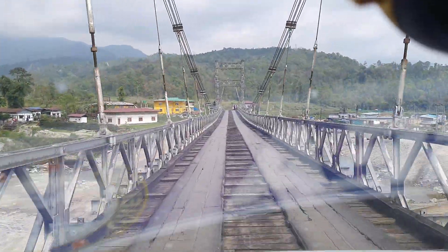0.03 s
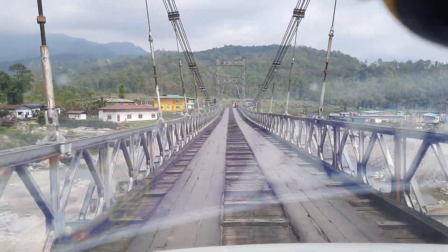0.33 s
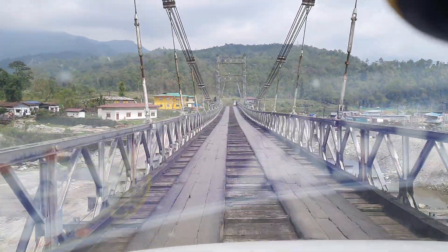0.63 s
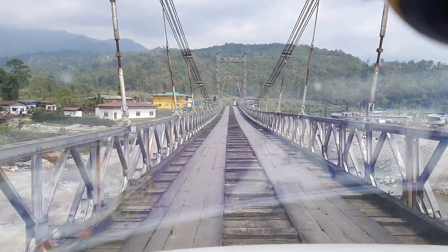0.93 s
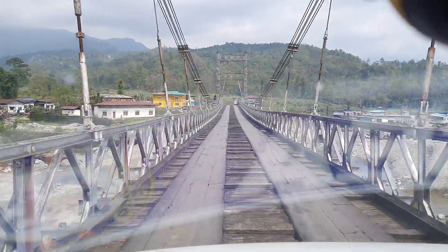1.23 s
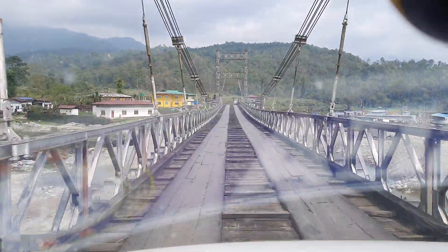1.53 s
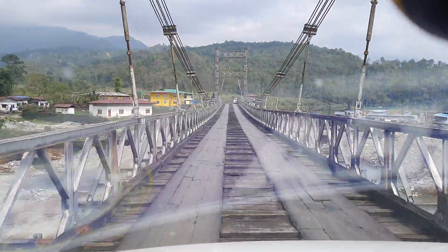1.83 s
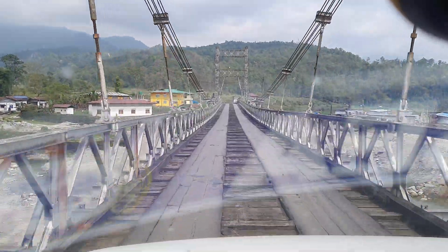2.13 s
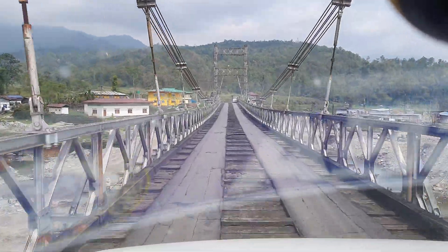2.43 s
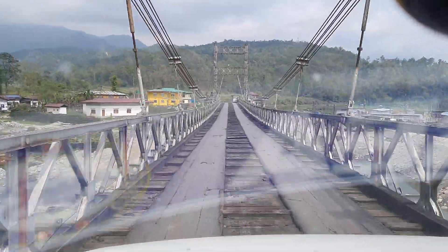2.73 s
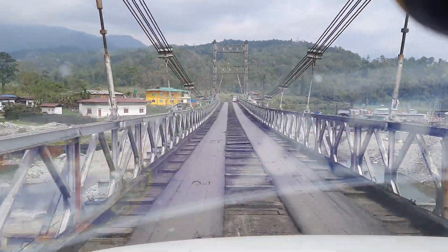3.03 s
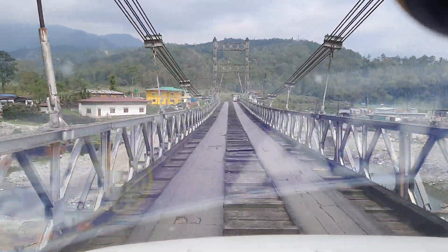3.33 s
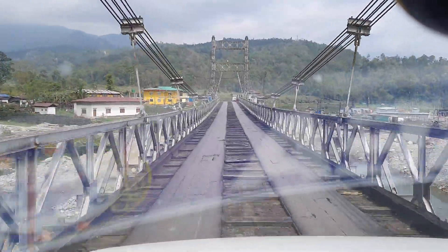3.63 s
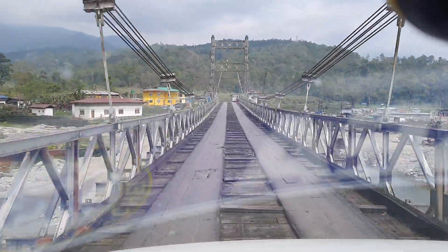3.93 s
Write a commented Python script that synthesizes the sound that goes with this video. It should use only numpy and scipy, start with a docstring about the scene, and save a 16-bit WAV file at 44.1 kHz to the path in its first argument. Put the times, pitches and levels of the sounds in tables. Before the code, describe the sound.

Bridge planks thump and rattle beneath a creeping car, heard from inside with engine rumble.

```python
"""Loose planks under a car

A stereo microphone behind the windscreen, as the car creeps over the deck of a steel suspension bridge.
Just below, planks tip and slap on their bearers, heavy timbers knock and the wheels thump the body.
Close by, plastic cabin trim ticks. Loose metal jingles, one timber groans and grit hisses under the
tyres, all over the low rumble of engine and rolling."""
import sys
import numpy as np
from scipy import signal
from scipy.fft import rfft, irfft, next_fast_len
from scipy.io import wavfile
from scipy.ndimage import uniform_filter1d

SR = 44100
rng = np.random.default_rng(int(sys.argv[2]) if len(sys.argv) > 2 else 0)


def master_out(mix):
    """Clip the mix to full scale and print it as 16-bit PCM to the path in sys.argv[1]."""
    frames = np.transpose(np.atleast_2d(mix))
    ceiling = np.clip(frames, -1, 1)
    pcm = np.round(ceiling * 32767).astype(np.int16)
    wavfile.write(sys.argv[1], SR, pcm)


N = 176400

# Levels in the tables are relative: they are set ahead of the mix and the stereo shaping.
# Planks slapping under the car. Each row: start in seconds, then wood, thud and crack levels in dB.
PLANK_SLAPS = [(0.076, -28, -20, -56), (0.414, -31, -23, -63), (0.522, -36, -19.5, -62),
               (0.752, -28, -21, -49), (0.829, -31, -20.5, -62), (0.875, -27, -19.5, -58),
               (0.929, -20, -21.5, -37.5), (0.997, -21, -16.5, -44), (1.16, -25.5, -19.5, -44.5),
               (1.347, -12.5, -16, -32), (1.422, -15.5, -20.5, -30), (1.556, -21.5, -17, -40.5),
               (1.614, -21, -23.5, -43.5), (1.756, -22.5, -23, -42), (2.147, -22, -17, -40.5),
               (2.321, -30, -18, -50), (2.362, -21.5, -19, -42.5), (2.456, -21.5, -20, -42.5),
               (2.701, -22.5, -17.5, -43.5), (2.764, -31.5, -18, -48.5), (2.84, -16.5, -13, -32),
               (2.872, -23, -15, -46), (2.978, -25.5, -35.5, -49.5), (3.151, -24.5, -19.5, -45),
               (3.22, -16.5, -18, -42), (3.31, -28.5, -40, -41.5), (3.359, -21.5, -28, -35.5),
               (3.454, -24.5, -18.5, -52), (3.671, -23, -24.5, -39), (3.806, -28.5, -29.5, -59),
               (3.858, -28, -22.5, -41.5), (3.895, -21.5, -22, -48), (3.959, -23.5, -21, -42.5)]
# Soft wheel thumps. Each row: start in seconds, level in dB.
WHEEL_THUMPS = [(0.047, -20.5), (0.448, -21.5), (0.885, -19.5), (0.962, -17), (1.785, -17), (1.915, -16),
                (2.176, -25), (2.339, -19.5), (2.371, -16), (2.781, -21.5), (2.932, -18.5), (3.096, -16.5),
                (3.118, -15.5), (3.478, -21.5), (3.504, -20), (3.828, -19)]
# Cabin trim, close to the microphone. Each row: start in seconds, tick level in dB, tap level in dB.
TRIM_TICKS = [(0.1256, -47, -57), (0.3103, -40.5, -57), (1.0006, -29.5, -32.5), (1.3512, -36, -41.5),
              (1.4703, -51, -35.5), (1.491, -40, -41.5), (1.525, -46, -39.5), (1.6876, -53, -38.5),
              (2.0214, -38, -36), (2.15, -47, -37.5), (2.186, -61, -35), (2.238, -57, -34),
              (2.4033, -33.5, -61), (2.515, -41, -54), (2.582, -39.5, -68), (2.6907, -35, -32),
              (2.7236, -47, -36), (2.781, -37.5, -38.5), (3.03, -40.5, -38), (3.0716, -47, -40),
              (3.3963, -70, -32), (3.8564, -42, -36)]
# Heavy timbers and loose metal. Each row: start in seconds, pitch in Hz, level in dB.
BEARER_KNOCKS = [(1.35, 193, -16), (1.836, 125, -11), (1.863, 263, -19), (1.882, 160, -12.5),
                 (2.859, 141, -15), (2.906, 202, -15), (3.23, 160, -21)]
METAL_JINGLES = [(0.205, 8900, -67.5), (0.381, 8700, -63), (0.382, 5080, -57), (0.62, 3470, -59),
                 (0.871, 3770, -58), (0.95, 5140, -57), (1.025, 5270, -54), (1.281, 3730, -50.5),
                 (1.925, 5900, -69)]
# Grit under a tyre. Each row: start in seconds, level in dB, seconds for the crunch to fade by 30 dB.
GRIT_PATCHES = [(0.082, -50, 1), (0.378, -53.5, 0.34), (0.511, -53, 0.074), (0.893, -49, 0.79),
                (1.006, -38, 0.042), (1.168, -49, 0.23), (1.416, -46.5, 0.45), (2.319, -46.5, 0.28),
                (2.399, -45.5, 0.31), (2.851, -47, 0.27), (3.147, -44.5, 0.22), (3.223, -46.5, 0.92),
                (3.456, -45, 0.14), (3.816, -43, 0.17)]
# The rolling background. Each row: time in seconds, rumble level in dB, tyre hiss level in dB.
ROLLING_LEVELS = [(0, -24.5, -41.5), (.3, -31, -68.5), (0.701, -28, -53), (1.3, -22, -48), (1.7, -26, -52),
                  (2.3, -22.5, -46.5), (2.8, -24.5, -47.5), (3.299, -19.5, -44), (3.678, -26.5, -47),
                  (4, -18, -45.5)]
# Resonances of plank, deck and car body. Each row: frequency in Hz, width in Hz, gain in dB.
PLANK_MODES = [(315, 75, -0.5), (464.4, 74, 2), (611, 47.5, 3), (756, 118, -3), (899, 50, -2.5)]
DECK_MODES = [(1428, 230, -3.5), (2064, 220, 1), (2270, 51, 4), (2800, 170, 1.5)]
BODY_MODES = [(75, 21.6, -3.5), (103.4, 33.2, 0), (132, 41, 2.5), (187.2, 87.5, -0.5), (214, 71.6, 0),
              (293, 50.6, -8), (407, 230, -17)]
# Tone colour of each source from inside the car. Each row: frequency in Hz, gain in dB.
CRACK_SPECTRUM = [(300, -19.5), (900, 3.5), (2500, -2), (3200, -6), (4500, -28), (9000, -31.5),
                  (16000, -56)]
TICK_SPECTRUM = [(300, -25), (1200, -21.5), (5200, 4.5), (6150, 2.5), (9500, -10.5), (12500, -3.5),
                 (16000, -10)]
TAP_SPECTRUM = [(200, -46), (800, 7), (5000, -15.5), (12000, -32.5)]
GRIT_SPECTRUM = [(300, -27.5), (1200, 1), (3700, -2), (6500, -15), (8500, -21), (16000, -22.5)]
RUMBLE_SPECTRUM = [(20, -26), (38, -1), (105, -2.5), (160, -11), (240, -12), (350, -25.5), (4000, -73.5)]
HISS_SPECTRUM = [(150, -20.5), (500, 20.5), (800, 2), (1200, 1), (2800, 3), (4200, -4.5), (6300, -11.5),
                 (8500, -24), (16000, -51.5)]
# Stereo width at the microphone. Each row: frequency in Hz, gain of the side channel in dB.
SIDE_GAIN = [(130, -21.5), (250, -6.5), (500, -3.5), (950, 7), (2000, 0.5)]
# Lean of the image to the left. Each row: frequency in Hz, left over right in dB.
LEFT_LEAN = [(120, 2.44), (400, 3.9), (1000, 1.9), (4000, 0.45)]

THUD_DB, WOOD_DB, CRACK_DB, THUMP_DB, TICK_DB, TAP_DB = -1.5, -9.5, -2, -0.5, -9.5, -5.5  # mix offsets
RUMBLE_DB, HISS_DB = 0, -1  # mix offsets
STRIKE_DB, STRIKE_S = 7.5, 0.00024  # the spike that opens a blow
PLANK_DETUNE = 0.061  # spread of log pitch from blow to blow
TILT_DB_PER_OCTAVE, USUAL_SLAP_DB = 0.13, -29  # brightening for each dB above the usual slap
KNOCK_CYCLES = 10  # until a knock has fallen by 60 dB
REBOUND_S, REBOUND_LOSS_DB = 0.0046, 8
JINGLE_RISE_S, JINGLE_T60_S, GRIT_RISE_S = 0.0046, 0.16, 0.02
RATTLES_PER_S, RATTLE_DB, RATTLE_SPREAD_DB = 20, -43.5, 4
FLICKER_DB, FLICKER_FULL_HZ = 2.6, 3200
CRUMBLE_DB, CRUMBLES_PER_S = 2.2, 190  # fast roughness in the tyre noise
TOP_HZ = 15900


def planks():
    """Just below the car, each slap is a thud, a wooden ring and a dry crack; wheels thump in between."""
    s, wood_db, thud_db, crack_db = np.array(PLANK_SLAPS).T
    thump_s, thump_db = np.array(WHEEL_THUMPS).T
    slaps = thud(s, thud_db + THUD_DB) + wood(s, wood_db + WOOD_DB) + crack(s, crack_db + CRACK_DB)
    return slaps + thud(thump_s, thump_db + THUMP_DB)


def thud(times, db):
    """A wheel drops and the body booms around the microphone."""
    blows = contact(len(times), rise_s=0.0012, hold_s=0.0056, t60=0.1, tail_db=-2.5, tail_t60=0.28)
    force = colour(blows, [(20, -20), (60, 2.5), (260, -6), (500, -8.0), (1500, -33.5)])
    return play(times, db, ring(force, BODY_MODES), 0.029)


def wood(times, db):
    """Planks ring, each at a slightly different pitch, brighter when hit harder."""
    blows = contact(len(times), rise_s=.001, hold_s=.004, t60=.05, tail_db=-9, tail_t60=.28)
    force = colour(blows, [(100, -17.5), (300, -2.0), (1000, -1.5), (1400, -6), (4000, -33.5)])
    stretches = np.exp(PLANK_DETUNE * rng.standard_normal(len(times)))
    sounds = []
    for push, loud, stretch in zip(force, db, stretches):
        tilt = TILT_DB_PER_OCTAVE * (loud - USUAL_SLAP_DB)
        modes = [(hz, bw, gain + tilt * np.log2(hz / PLANK_MODES[0][0])) for hz, bw, gain in PLANK_MODES]
        sounds.append(ring(push, modes, stretch))
    return play(times, db, sounds, 0.024)


def crack(times, db):
    """The plank's edge hits its bearer with a dry clack, each at its own pitch."""
    blows = contact(len(times), rise_s=.0007, hold_s=.007, t60=.05, tail_db=-16, tail_t60=.26)
    force = colour(blows, CRACK_SPECTRUM)
    stretches = np.exp(PLANK_DETUNE * rng.standard_normal(len(times)))
    clacks = [push + undb(7.5) * ring(push, DECK_MODES, k) for push, k in zip(force, stretches)]
    return play(times, db, clacks, 0.018)


def bearers():
    """A heavy timber bottoms on the frame: a few deep cycles and a weaker overtone."""
    s, hz, db = np.array(BEARER_KNOCKS).T
    t = np.arange(N // 16) / SR
    swing = lambda cycles: (np.sin(2 * np.pi * cycles) * np.minimum(2 * cycles, 1)
                            * undb(-60 * cycles / KNOCK_CYCLES))
    knocks = np.array([swing(f * t) + undb(-6.5) * swing(1.717 * f * t) for f in hz])
    return play(s, db, knocks[:, None], 0.014) * np.array([[1], [-.5]])  # mid and side gains


def trim():
    """Loose plastic near the microphone: a bright tick over a duller tap, then two uneven rebounds."""
    s, tick_db, tap_db = np.array(TRIM_TICKS).T
    out = tap(s, tap_db + TAP_DB)
    for bounce in range(3):
        blows = contact(len(s), rise_s=.0003, hold_s=.0012, t60=.014, tail_db=-17, tail_t60=.08)
        snaps = colour(blows, TICK_SPECTRUM)
        pitches_hz = rng.uniform(4000, 14000, (len(s), 2))
        ticks = [x + ring(x, [(hz, 250, 8) for hz in pair]) for x, pair in zip(snaps, pitches_hz)]
        out += play(s, tick_db + TICK_DB - bounce * REBOUND_LOSS_DB, ticks, 0.004)
        s = s + REBOUND_S * (.5 + rng.random(len(s)))
    return out


def tap(times, db):
    """Small, dull contacts of trim or boards."""
    blows = contact(len(times), rise_s=0.0003, hold_s=0.00056, t60=0.047, tail_db=-14, tail_t60=0.16)
    return play(times, db, colour(blows, TAP_SPECTRUM), 0.011)


def jingles():
    """Loose metal shakes: a scatter of tiny contacts makes a broad rattle with two thin rings in it."""
    s, hz, db = np.array(METAL_JINGLES).T
    t = np.arange(N // 16) / SR
    envelope = np.minimum(t / JINGLE_RISE_S, 1) * undb(-60 * t / JINGLE_T60_S)
    shakes = rng.standard_normal((len(s), 2, len(t))) ** 3 * envelope
    sounds = []
    for shake, f in zip(shakes, hz):
        broad = (f, f / 2, 0)
        sounds.append(ring(ring(shake, [broad]), [broad, (f * .93, 40, 11), (f * 1.02, 30, 16)]))
    return play(s, db, sounds, 0.031)


def groan(start_s=1.83, length_s=.10, hz=503, db=-39):
    """A timber rubs under the wheel: a brief, unsteady tone."""
    count = int(length_s * SR)
    pitch = hz * (1 + 0.017 * wander(70)[:count])
    tone = np.sin(2 * np.pi * (np.cumsum(pitch) / SR + rng.random((2, 1))))
    return play([start_s], [db], [tone * np.hanning(count)], length_s)


def rattles(effort):
    """Nearby boards chatter weakly at random, their level scaled by effort."""
    when, size = rng.random((int(RATTLES_PER_S * N / SR), 2)).T
    s, db = when * N / SR, RATTLE_DB + RATTLE_SPREAD_DB * (2 * size - 1)
    return (wood(s, db) + tap(s, db - 10)) * effort


def grit():
    """Dense grains that swell and fade as a tyre crosses a dusty board, brighter under load."""
    t = np.arange(N) / SR
    load = np.zeros(N)
    for s, db, t30 in GRIT_PATCHES:
        rise = np.clip((t - s) / GRIT_RISE_S, 0, 1)
        load += rise * undb(db - 30 * np.maximum(t - s - GRIT_RISE_S, 0) / t30)
    grains = rng.standard_normal((2, N)) * undb(2.7 * rng.exponential(size=N))
    crunch = level(colour(grains, GRIT_SPECTRUM), 0, N / SR)
    finest = signal.sosfiltfilt(signal.butter(2, 9000, "high", fs=SR, output="sos"), crunch)
    return (crunch - finest * (1 - load / load.max())) * load


def flicker(x):
    """The treble glints: narrow bands swell and sink by chance for a few hundredths of a second."""
    hz, _, bands = signal.stft(x, SR, nperseg=1024)
    chance = rng.standard_normal(bands.shape[1:])
    field = uniform_filter1d(uniform_filter1d(chance, 7, axis=0), 4, axis=1)
    depth_db = FLICKER_DB * np.minimum(hz / FLICKER_FULL_HZ, 1)[:, None] ** 2
    return signal.istft(bands * undb(depth_db * field / field.std()), SR)[1][:, :N]


def rolling(spectrum, db):
    """The background bed of engine and tyres: coloured noise that follows a level curve."""
    return level(colour(rng.standard_normal((2, N)), spectrum), 0, N / SR) * undb(db)


def contact(count, rise_s, hold_s, t60, tail_db, tail_t60):
    """Forces of count blows, mid and side: a hard strike, a dense chatter that dies fast, a weak tail."""
    t = np.arange(8192) / SR
    strike = undb(STRIKE_DB) * np.exp(-t / STRIKE_S)
    chatter = undb(-60 * np.maximum(t - hold_s, 0) / t60)
    tail = undb(tail_db - 60 * t / tail_t60)
    return rng.standard_normal((count, 2, len(t))) * np.minimum(t / rise_s, 1) * (strike + chatter + tail)


def ring(x, modes, stretch=1):
    """Damped resonances driven by x, summed with alternating signs; stretch scales their pitch."""
    return sum((-1) ** k * undb(db) * signal.lfilter(*signal.iirpeak(hz * stretch, hz / width, SR), x)
               for k, (hz, width, db) in enumerate(modes))


def colour(x, points):
    """Causal filter that follows (Hz, dB) points."""
    size = next_fast_len(x.shape[-1] + 1024, real=True) // 2 * 2
    hz, db = np.array(points, float).T
    curve_db = np.interp(np.log(np.arange(size // 2 + 1) * SR / size + 1), np.log(hz), db)
    cepstrum = irfft(np.log(undb(curve_db)))
    cepstrum[1:size // 2] *= 2  # fold to minimum phase
    cepstrum[size // 2 + 1:] = 0
    return irfft(rfft(x, size) * np.exp(rfft(cepstrum)))[..., :x.shape[-1]]


def wander(per_s):
    """A smooth random curve with a spread of 1."""
    k = int(SR / per_s)
    steps = np.repeat(rng.standard_normal(N // k + 1), k)
    curve = uniform_filter1d(uniform_filter1d(steps, k), k)[:N]
    return curve / curve.std()


def play(times, db, sounds, over_s):
    """Lay each sound down at its time, with the energy of its level held for over_s."""
    out = np.zeros((2, N))
    for s, loud, x in zip(times, db, sounds):
        i = int(np.clip(s * SR, 0, N - 1))
        out[:, i:i + x.shape[-1]] += level(x, loud, over_s)[:, :N - i]
    return out


def level(x, db, over_s):
    """Scale each channel so that its energy equals that level held for over_s."""
    return x * undb(db) * np.sqrt(over_s * SR / np.sum(x ** 2, axis=-1, keepdims=True))


def undb(db):
    """Decibels to amplitude."""
    return 10 ** (np.asarray(db) / 20)


def scene():
    """Everything meets at the microphone as mid and side, then opens out to left and right."""
    t = np.arange(N) / SR
    roll = np.array(ROLLING_LEVELS)
    rumble_db, hiss_db = (np.interp(t, roll[:, 0], roll[:, k]) for k in (1, 2))
    rumble = rolling(RUMBLE_SPECTRUM, rumble_db + RUMBLE_DB)
    hiss = rolling(HISS_SPECTRUM, hiss_db + HISS_DB)
    tyres = flicker(hiss + grit()) * undb(CRUMBLE_DB * wander(CRUMBLES_PER_S))
    effort = undb(rumble_db - rumble_db.mean())  # boards chatter louder as the rumble swells
    mid, side = planks() + bearers() + trim() + jingles() + groan() + rattles(effort) + tyres + rumble
    side = colour(side, SIDE_GAIN)
    return np.array([colour(mid + way * side, [(hz, way * db / 2) for hz, db in LEFT_LEAN])
                     for way in (1, -1)])


def record(dry):
    """The recorder clips at full scale and cuts the top."""
    lowpass = signal.ellip(8, .2, 70, TOP_HZ, fs=SR, output="sos")
    return signal.sosfilt(lowpass, np.clip(dry, -1, 1))


dry = scene()
out = record(dry)
master_out(out)
```